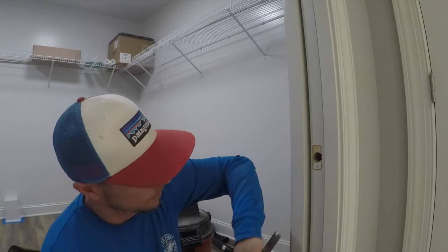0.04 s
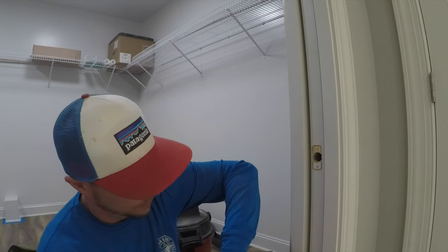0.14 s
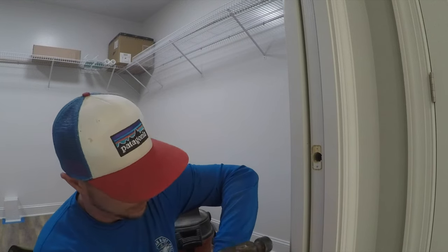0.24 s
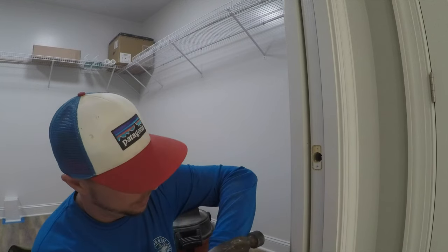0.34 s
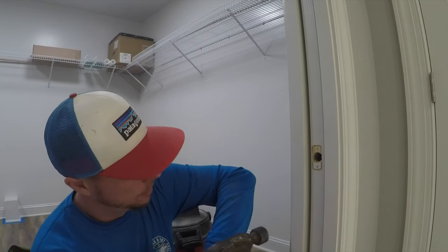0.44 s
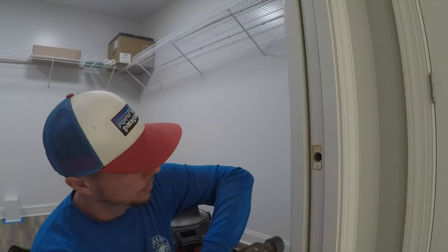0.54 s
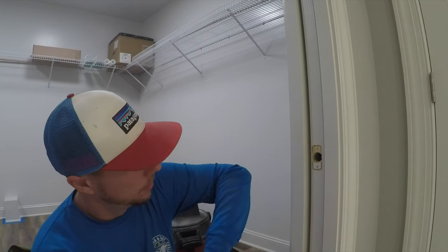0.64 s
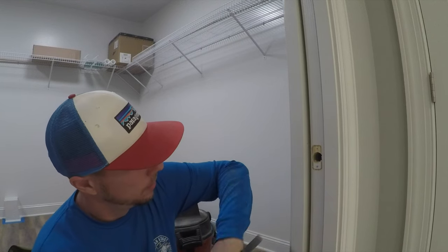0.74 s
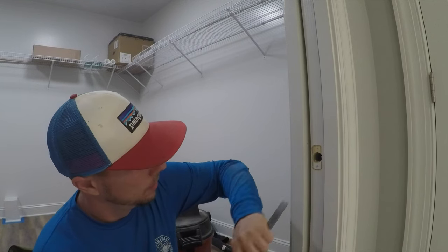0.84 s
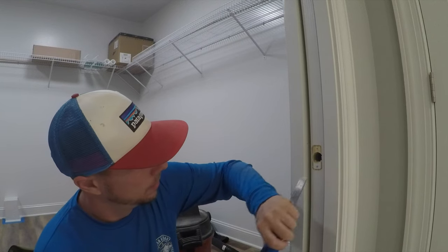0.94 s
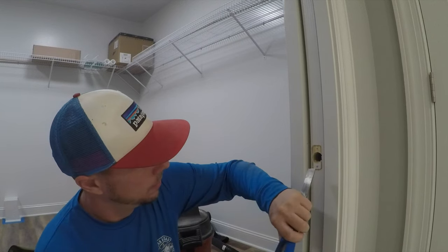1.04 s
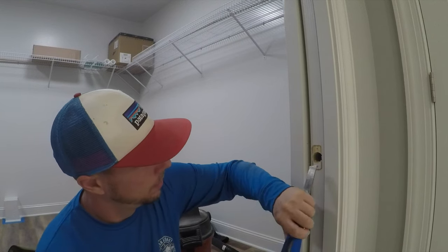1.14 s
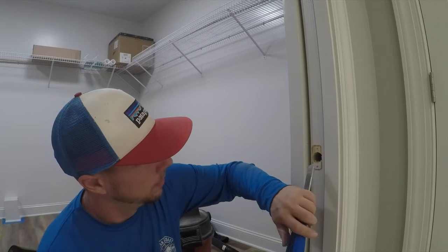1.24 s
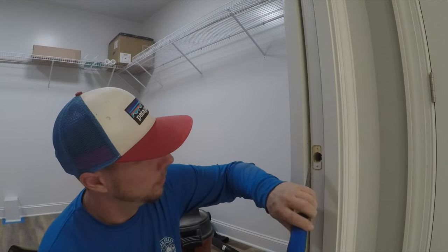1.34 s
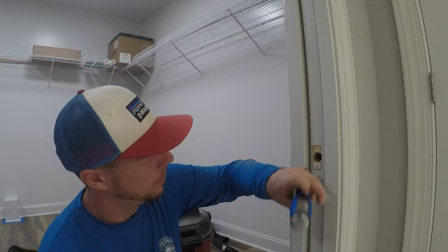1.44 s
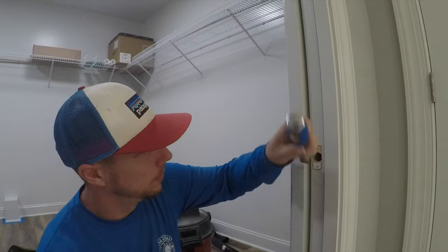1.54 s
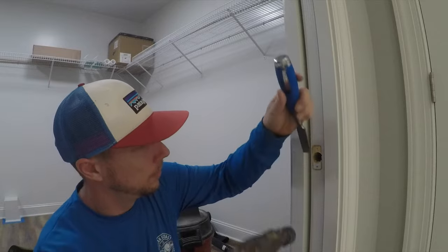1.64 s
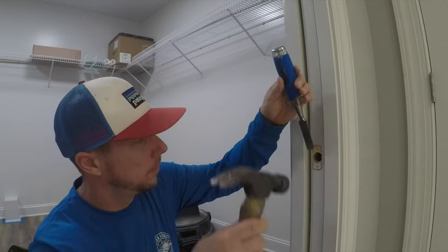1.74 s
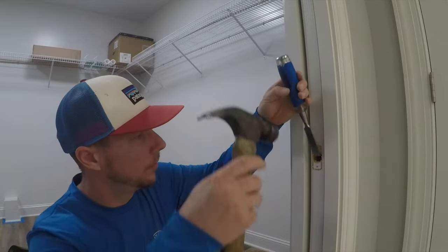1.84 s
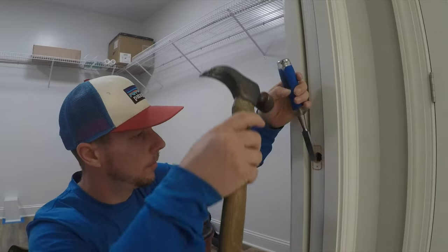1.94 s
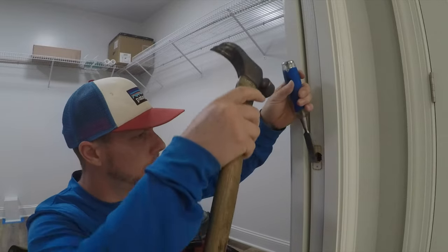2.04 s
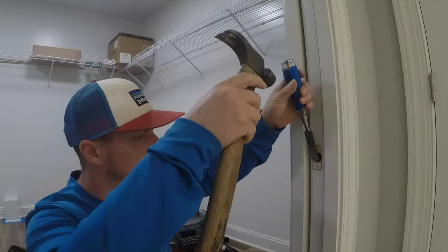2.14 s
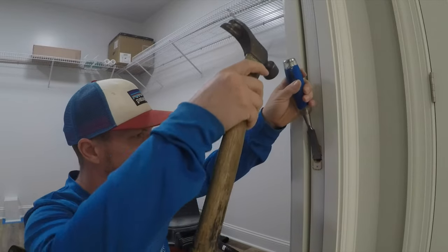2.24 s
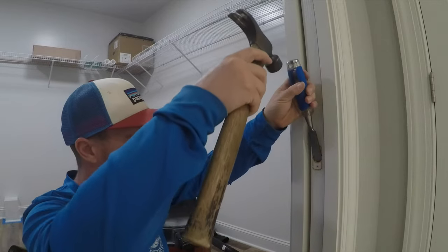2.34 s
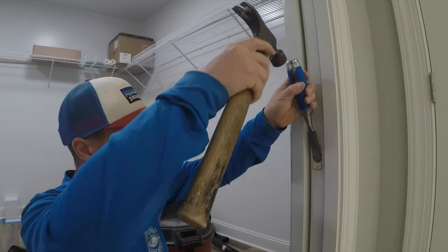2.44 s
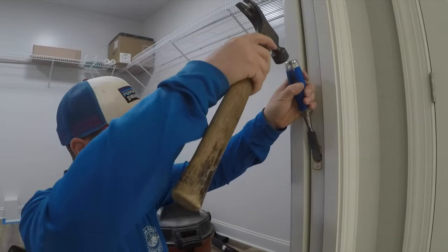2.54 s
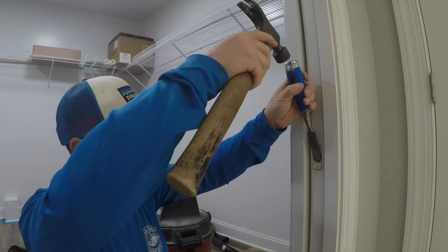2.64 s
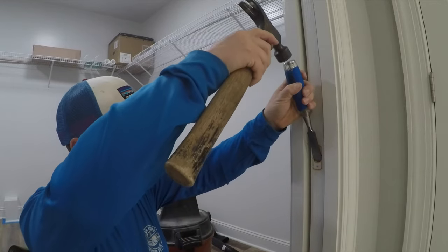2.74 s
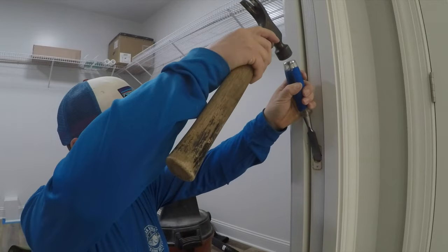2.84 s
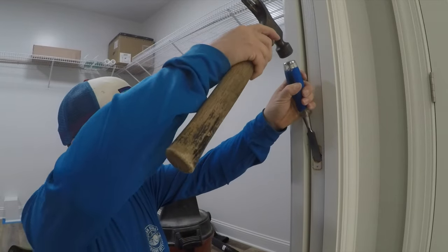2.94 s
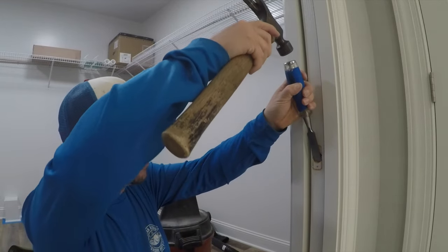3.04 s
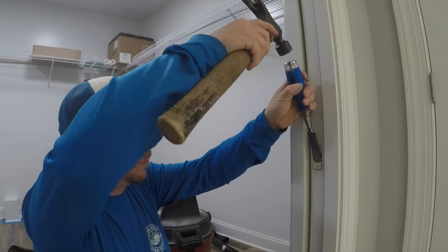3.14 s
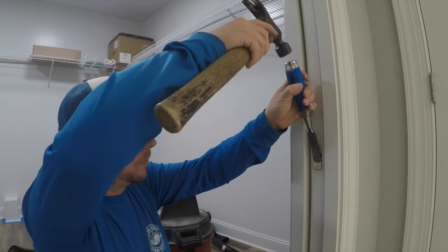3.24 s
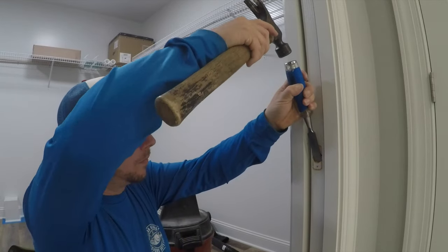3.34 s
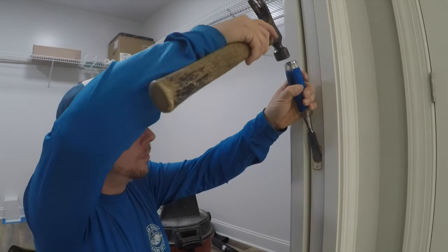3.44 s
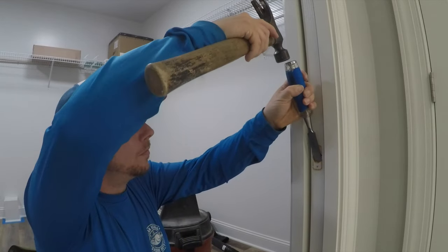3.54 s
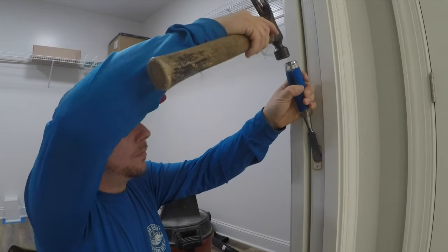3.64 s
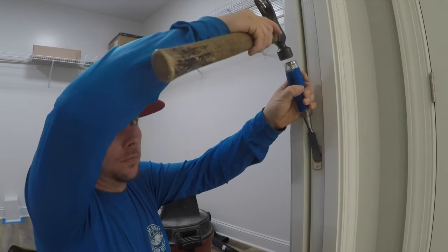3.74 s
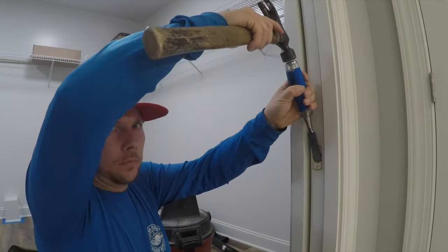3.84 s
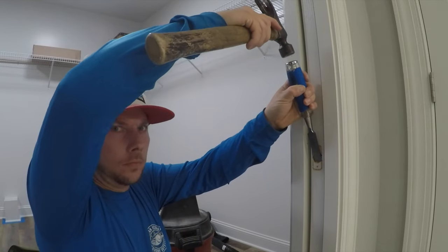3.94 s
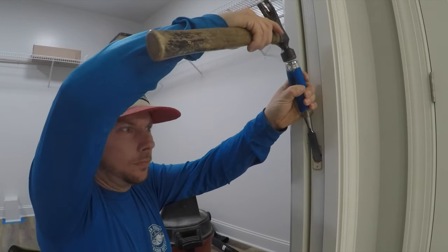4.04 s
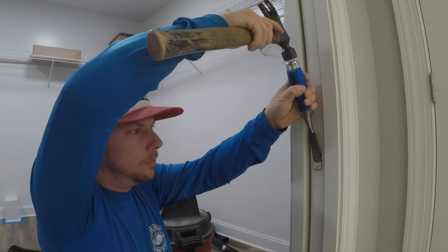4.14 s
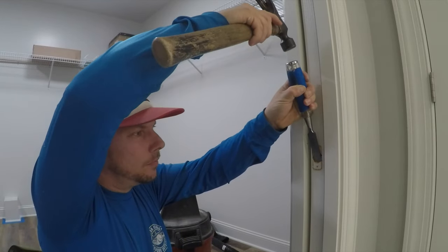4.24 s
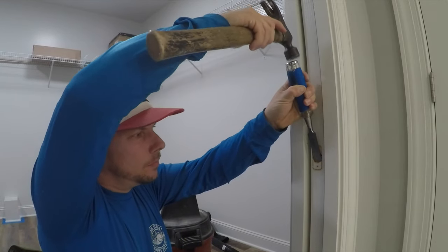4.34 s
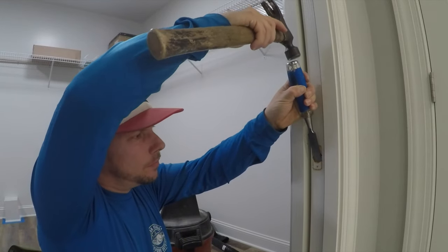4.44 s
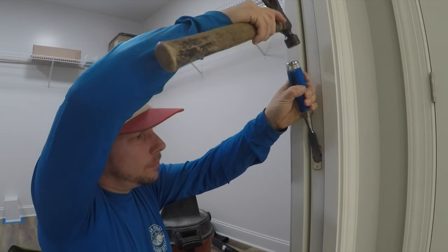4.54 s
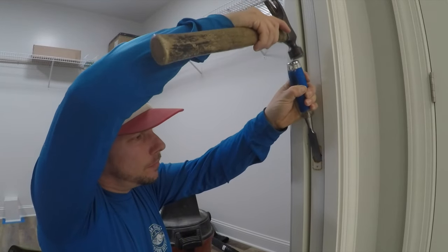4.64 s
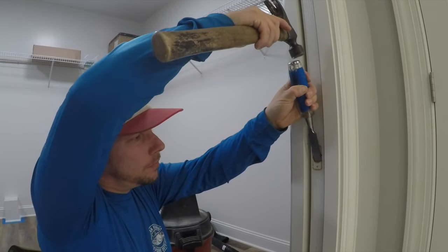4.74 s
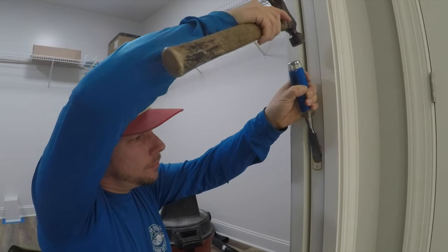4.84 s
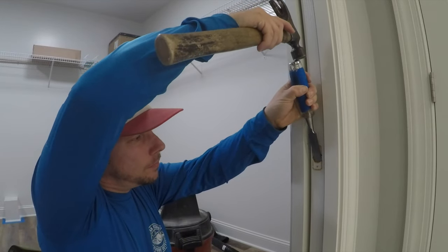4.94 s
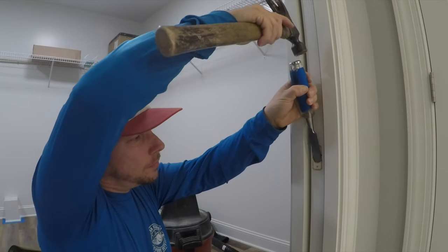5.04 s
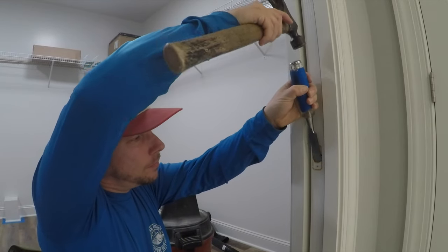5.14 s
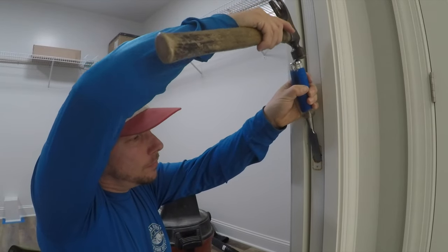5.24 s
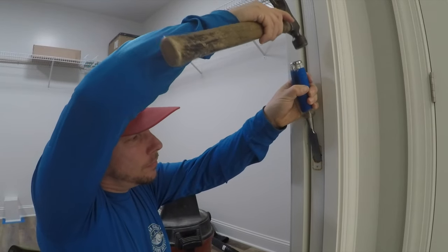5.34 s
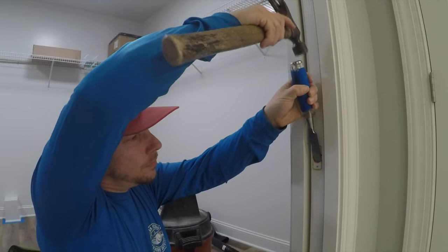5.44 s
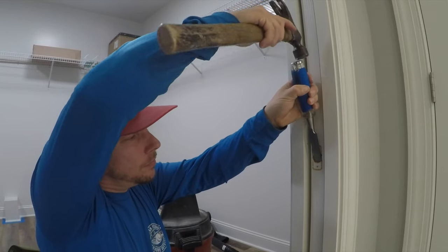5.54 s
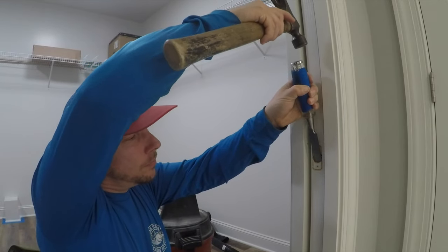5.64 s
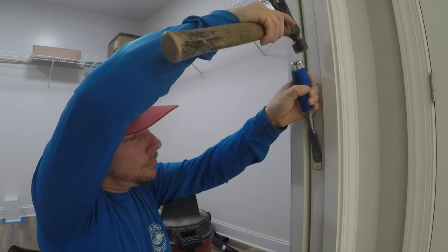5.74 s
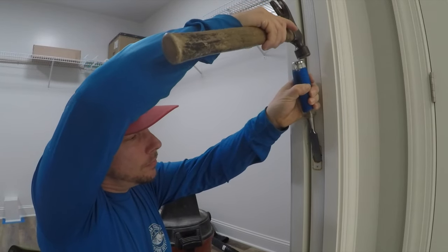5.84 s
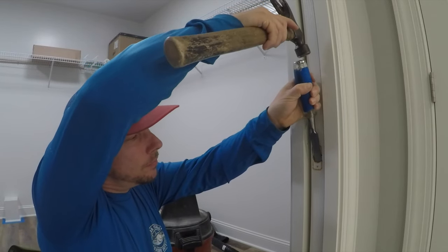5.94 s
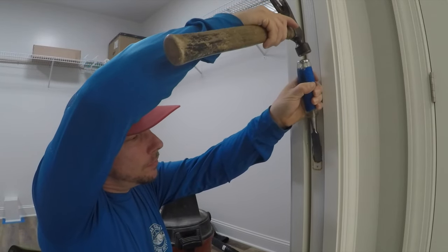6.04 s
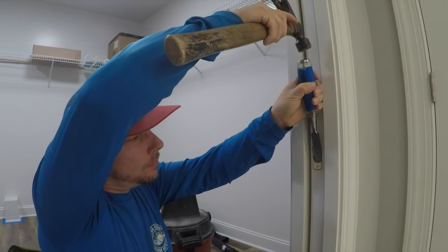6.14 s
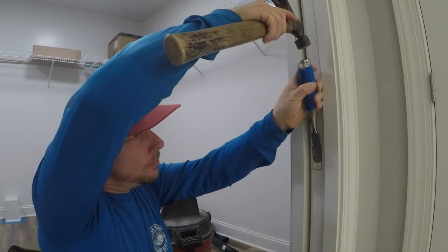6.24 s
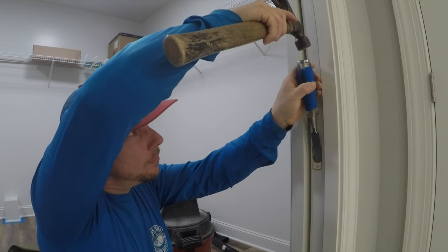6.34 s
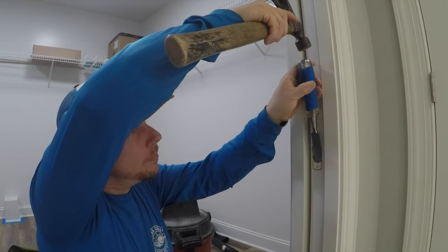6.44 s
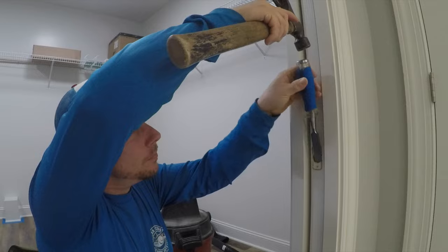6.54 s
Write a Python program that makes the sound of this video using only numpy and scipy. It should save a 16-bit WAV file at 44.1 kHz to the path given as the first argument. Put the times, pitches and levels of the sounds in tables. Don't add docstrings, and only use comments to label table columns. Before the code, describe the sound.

A close small microphone in a bare, echoing room, with soft low-heavy hiss throughout. At the start the faint echo of an earlier knock fades, with two tiny ticks at about 0.1 seconds. At 1.9 a tool meets the wooden jamb with a dull, modest knock, followed by faint bumps and hand shuffling until 2.5. Near quiet follows. At 3.8 a hammer taps the chisel's steel cap lightly, again at 4.05, then more firmly at 4.35 and 4.65, and nearly full force at 4.9, 5.2 and 5.45. Each blow is a very short, bright steel crack with brief blade ring and woody knock, a low wall thump just behind, and a diffuse tail lasting about a second, overlapping the next. The loudest are slightly clipped. At 5.8 comes a softer, duller tap. The echo decays under a low foot shift and barely audible ticks around 6.2.

```python
import sys
import numpy as np
from scipy import signal
from scipy.fft import rfft, irfft
from scipy.io import wavfile
from scipy.ndimage import uniform_filter1d

SR = 44100
rng = np.random.default_rng(int(sys.argv[2]) if len(sys.argv) > 2 else 0)


def voltage_ratio(level):
    return 10 ** (np.asarray(level, float) / 20)


def put_to_file(sound):
    columns = np.atleast_2d(sound).T
    safe = np.clip(columns, -1, 1)
    whole_steps = np.round(safe * 32767)
    wavfile.write(sys.argv[1], SR, whole_steps.astype(np.int16))


N = 291060

# t/s, force into the jamb/dB, steel-on-steel sharpness/dB, chisel flex/dB, head ring/dB
BLOWS = [
    (3.781, -16, -13, -11.5, -39.5),
    (4.049, -11, -7.5, -10, -31.5),
    (4.3484, -4, -3, -4, -34),
    (4.6453, -2, -1, -4, -31),
    (4.9206, -0.5, -0.5, -1, -25.5),
    (5.1824, 0, -0.5, 2, -37),
    (5.4544, 0, -0.5, 0.5, -24.5),
    (5.8185, -11, -24.5, -16.5, -44),
]
SEAT_HZ = [3800, 3250, 3350, 3980, 3870, 4180, 3330, 3440]
# f/Hz, level/dB, t60/s
JAMB_MODES = [(841, 0, 0.047), (948, -16.5, .5), (1076, -14.5, 0.44), (1250, -12, .04)]
GRAIN_MODES = [(1295, 0, 0.034), (1567, 1.5, .04), (1744, 5.5, 0.028), (1953, 0, 0.038),
               (2198, -11.5, 0.12)]
# f/Hz, level/dB, t60/s
BLADE_MODES = [(2870, -9, 0.062), (3177, 4, 0.029), (3410, 2, .035)]
SHANK_MODES = [(3945, -3.5, 0.025), (3812, -2.5, 0.024), (4178, -4, 0.031), (4533, -5, 0.022),
               (4965, -7, 0.021)]
TANG_MODES = [(8050, 0.002, 0.06)]
NECK_MODES = [(13730, 0.0041, .04)]
COLLAR_MODES = [(9100, 0.5, 0.036), (8866, 4, .01), (9330, -4.5, 0.0092), (9780, -8, .015)]
CAP_MODES = [(7490, -1.5, 0.0087), (7870, 6, 0.0088), (8250, 3, 0.0087)]
# f/Hz, level/dB, t60/s
FACE_MODES = [(13970, 3, 0.011), (14480, 1.5, .007), (13400, -8, .008), (11070, -4, 0.0092),
              (11860, -8, 0.0078)]
HEAD_MODES = [(6842, -3, .3), (6400, -4, .012)]
CLAW_MODES = [(5523, 0, .3)]
# f/Hz, density/dB per Hz
CRACK_SPECTRUM = [(500, -58.5), (900, -27), (1500, -1.5), (4000, -2.5), (6000, -1.5), (9000, -5.5),
                  (10500, -11), (15500, -18)]
# f/Hz, level/dB, t60/s
STUD_MODES = [(38.4, 5, 0.52), (33, -17, .9), (46.2, -18.5, 0.66)]
BOARD_MODES = [(87, -1, .3), (132.7, -2, 0.35), (164.5, -1, 0.28), (195, 0, 0.32), (259.2, -1.5, 0.38)]
TRIM_MODES = [(333, -1.5, 0.18), (415, -2.5, 0.22), (520, -0.5, 0.18), (594, -0.5, 0.16), (664, -0.5, 0.24)]
# t/s, peak level/dB, room/dB, boards/dB, trim/dB
KNOCKS = [
    (1.865, -20.5, -6, -12.5, -10.5),
]
# f/Hz, level/dB, t60/s
KNOCK_MODES = [(630, -8, .08), (704, -4.5, 0.14), (790, -7.5, .1), (855, -2.5, 0.088), (1120, -18, 0.014),
               (1280, -3, 0.037), (1450, -4, 0.031), (1670, -6, .04), (1970, -6.5, 0.032),
               (2200, -7.5, 0.025), (2500, -12, .018), (2880, -10, 0.029), (3270, -11, 0.023),
               (3660, -11, 0.024)]
# t/s, peak level/dB, f/Hz, t60/s
TICKS = [(.0818, -40, 11500, .003), (.0818, -48, 6500, .003), (.1478, -34, 3000, .008),
         (1.2, -63, 1650, .6), (1.35, -62, 420, .3), (1.51, -54, 140, .25), (2.25, -56, 200, .3),
         (2.34, -55, 140, .2), (2.35, -50, 45, .35), (2.48, -53, 170, .25), (2.52, -57, 260, .15),
         (6.195, -60, 8500, .01), (6.235, -62, 8500, .01)]
# f/Hz, t60/s
ROOM_DECAY = [(40, 0.14), (200, .7), (600, 1.05), (1500, 1.28), (3800, 1.09), (8000, 0.72), (14000, 0.33)]
# f/Hz, level/dB
ROOM_COLOUR = [(100, 10), (500, 1), (1500, -1), (4000, -1), (8000, -6), (11000, -2), (14000, -2)]
# f/Hz, density/dB per Hz
ECHO_SPECTRUM = [(88, -46), (150, -24), (205, -27), (270, -5.5), (841, 3), (1380, 1), (7590, -13.5),
                 (12000, -24), (15600, -61), (22000, -120)]
# t/s, floor level/dB, shuffle level/dB
MOVES = [
    (.05, -77, -82),
    (1.5, -78, -73),
    (1.95, -62, -66),
    (2.4, -62, -76),
    (3.3, -79.5, -79.5),
    (6.3, -55, -79.5),
]
# f/Hz, density/dB per Hz
FLOOR_SPECTRUM = [(15, -20), (30, 0), (50, -3), (80, -25), (200, -90)]
SHUFFLE_SPECTRUM = [(80, -30), (250, -2), (800, 0), (1800, -5), (3500, -20), (6000, -60)]
HISS_SPECTRUM = [(12, -36.5), (22, 0.5), (45, -11), (120, -15.5), (400, -20), (1600, -26.5), (3400, -27),
                 (14700, -32.5)]

RISE_S = .0009


def hammer():
    out = np.zeros(N)
    for (s, force, sharp, flex, head_db), seat_hz in zip(BLOWS, SEAT_HZ):
        steel = struck_steel(sharp, head_db) + crack(sharp)
        add(out, s, in_room(wood_and_blade(force, flex, seat_hz), -6.5, blur_hz=110))
        add(out, s, in_room(neck_and_tang(force, sharp), -5, blur_hz=60))
        add(out, s, in_room(steel, -4, blur_hz=364))
    return out


def wood_and_blade(force, flex, seat_hz):
    parts = [
        (JAMB_MODES, (-18, 1.28), force),
        (GRAIN_MODES, (-17, .75), force),
        (seated(BLADE_MODES, seat_hz), (-12, 1.1), flex),
        (seated(SHANK_MODES, seat_hz), (-6.5, .83), flex),
    ]
    return sum(follow(law, cause) * ring(modes, 1.44 * RISE_S, 2.2, SR // 2) for modes, law, cause in parts)


def seated(modes, seat_hz):
    boost_db, width_hz = 4, 200
    out = []
    for hz, db, t60 in modes:
        nearness = np.exp(-((hz - seat_hz) / width_hz) ** 2)
        out.append((hz, db + boost_db * (nearness - .35), t60))
    return out


def struck_steel(sharp, head_db):
    parts = [
        (CAP_MODES, (0, 1.1)),
        (COLLAR_MODES, (-10, 1.03)),
        (FACE_MODES, (-10.5, 2.2)),
        (CLAW_MODES, (-34.5, .38)),
    ]
    steel = sum(follow(law, sharp) * ring(modes, .99 * RISE_S, .27, SR // 2) for modes, law in parts)
    return steel + voltage_ratio(head_db + 3.5) * ring(HEAD_MODES, 1.1 * RISE_S, .8, SR // 2)


def neck_and_tang(force, sharp):
    clean = 1.1 * (sharp - force)
    neck = follow((-21, .75), sharp) * ring(NECK_MODES, RISE_S, .8, SR // 2)
    tang = follow((-17, .6), sharp + clean) * ring(TANG_MODES, RISE_S, .8, SR // 2)
    return neck + tang


def crack(sharp):
    t = np.arange(SR // 2) / SR
    envelope = voltage_ratio(-60 * t / .018) * (1 - np.exp(-(t / RISE_S) ** 2))
    return follow((-6, .79), sharp) * envelope * noise(CRACK_SPECTRUM, SR // 2)


def wall():
    studs_late_s, panels_late_s = .024, .0033
    out = np.zeros(N)
    for s, force, *_ in BLOWS:
        studs = follow((-31.5, .76), force) * ring(STUD_MODES, .03, 1.5, SR)
        boards = follow((-41.5, 1.05), force) * ring(BOARD_MODES, .012, 1.5, SR // 2)
        trim = follow((-41, .5), force) * ring(TRIM_MODES, .0029, 1.6, SR // 2)
        add(out, s + studs_late_s, studs)
        add(out, s + panels_late_s, in_room(boards + trim, -1.5, blur_hz=88))
    return out


def tool_on_jamb():
    out, size = np.zeros(N), SR // 2
    t = np.arange(size) / SR
    for s, db, room_db, boards_db, trim_db in KNOCKS:
        knock = ring(KNOCK_MODES, .0016, .7, size, loose=3)
        knock += voltage_ratio(boards_db) * ring(BOARD_MODES[1:], .015, 1.1, size)
        knock += voltage_ratio(trim_db) * ring(TRIM_MODES, .011, 2.7, size)
        add(out, s, in_room(voltage_ratio(db - 9) * knock, room_db, blur_hz=200))
        envelope = voltage_ratio(-46 - 60 * t / .03) * np.minimum(1, t / .0014)
        add(out, s, envelope * noise(ECHO_SPECTRUM, size))
    return out


def ticks():
    out = np.zeros(N)
    for s, db, hz, t60 in TICKS:
        trio = [(hz, db - 3, t60), (hz * .82, db - 5, t60), (hz * 1.2, db - 5, t60)]
        add(out, s, ring(trio, t60 / 10, 2.0, SR // 2))
    return out


def earlier_echo():
    t = np.arange(N) / SR
    return voltage_ratio(-56 - 37 * t) * noise(ECHO_SPECTRUM, N)


def stirring():
    swell_db_per_s, settle_db_per_s, rest_db = 70.5, 39, -89
    t = np.arange(N) / SR
    s, *peaks_db = np.transpose(MOVES)[:, :, None]
    away_db = np.maximum(swell_db_per_s * (s - t), settle_db_per_s * (t - s))
    floor, shuffle = [voltage_ratio(rest_db) + voltage_ratio(db - away_db).sum(axis=0) for db in peaks_db]
    return voltage_ratio(-4.5) * floor * noise(FLOOR_SPECTRUM, N) + shuffle * noise(SHUFFLE_SPECTRUM, N)


def hiss():
    return voltage_ratio(-65.53) * noise(HISS_SPECTRUM, N)


def follow(law, cause_db):
    full_db, slope = law
    return voltage_ratio(full_db + slope * cause_db)


def ring(modes, attack_s, scatter_db, size, loose=.4):
    t = np.arange(size) / SR
    hz, db, t60 = np.transpose(modes)[:, :, None]
    detune, strength, phase = rng.standard_normal((3, len(modes), 1))
    waves = np.sin(2 * np.pi * hz * (1 + .001 * detune) * t + loose * phase)
    decay = voltage_ratio(db + scatter_db * strength - 60 * t / t60)
    return np.sum(decay * waves, axis=0) * (1 - np.exp(-(t / attack_s) ** 2))


def in_room(x, room_db, blur_hz):
    hz, t, z = signal.stft(rng.standard_normal(SR * 3 // 2), SR, nperseg=256)
    decay_db = 60 * t / along(ROOM_DECAY, hz)[:, None]
    gain = voltage_ratio(along(ROOM_COLOUR, hz)[:, None] - decay_db)
    tail = signal.istft(z * gain, SR, nperseg=256)[1]
    build = 1 - np.exp(-np.arange(len(tail)) / SR / .009)
    blur_bins = max(1, round(blur_hz * len(tail) / SR))
    power = uniform_filter1d(np.abs(rfft(x, len(tail))) ** 2, blur_bins)
    wet = irfft(rfft(tail) * np.sqrt(np.abs(power)), len(tail))
    wet = build * wet / np.linalg.norm(tail)
    wet[-SR // 5:] = 0
    return voltage_ratio(room_db) * wet + np.pad(x, (0, len(wet) - len(x)))


def noise(spectrum, size):
    hz = np.fft.rfftfreq(size, 1 / SR)
    x = irfft(rfft(rng.standard_normal(size)) * voltage_ratio(along(spectrum, hz)), size)
    return x / np.sqrt(np.mean(x ** 2) + 1e-20)


def along(points, hz):
    f, v = np.transpose(points)
    return np.interp(np.log(hz + 1), np.log(f + 1), v)


def add(track, s, x):
    part = track[round(s * SR):][:len(x)]
    part += x[:len(part)]


def scene():
    mix = hammer() + wall() + tool_on_jamb() + ticks()
    mix += earlier_echo() + stirring() + hiss()
    return mix[None]


def roll_off(x):
    return signal.sosfilt(signal.butter(12, 16190, fs=SR, output="sos"), x)


def record(dry):
    band_limit = signal.ellip(8, .3, 45, 15300, fs=SR, output="sos")
    limited = signal.sosfilt(band_limit, dry)
    clipped = limited / (1 + np.abs(limited) ** 12) ** (1 / 12)
    return roll_off(clipped)


dry = scene()
out = record(dry)
put_to_file(out)
```